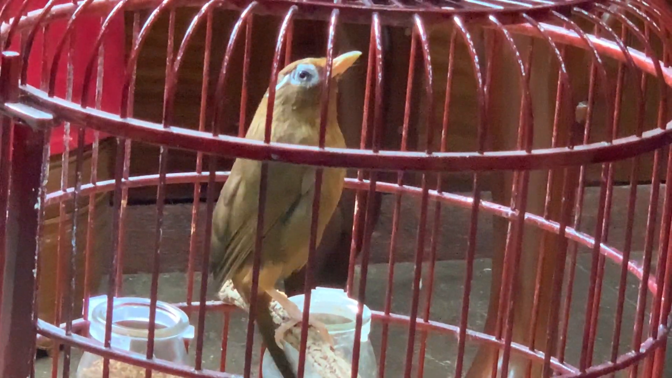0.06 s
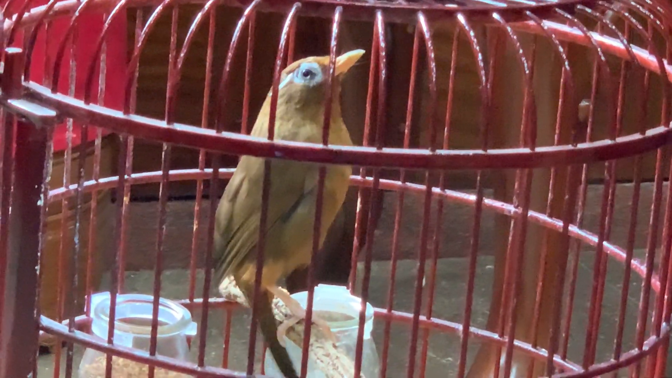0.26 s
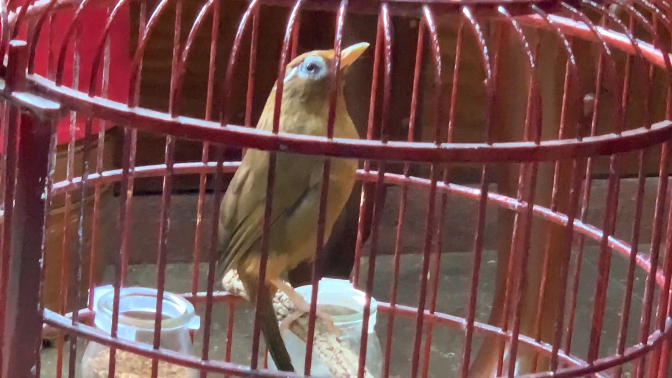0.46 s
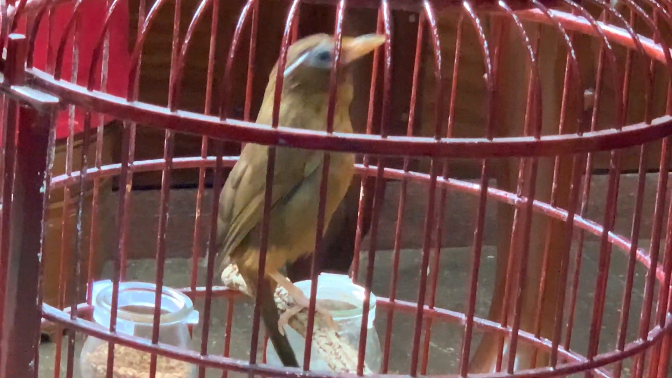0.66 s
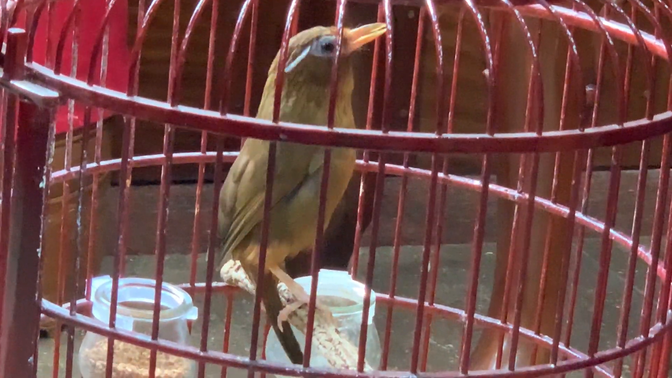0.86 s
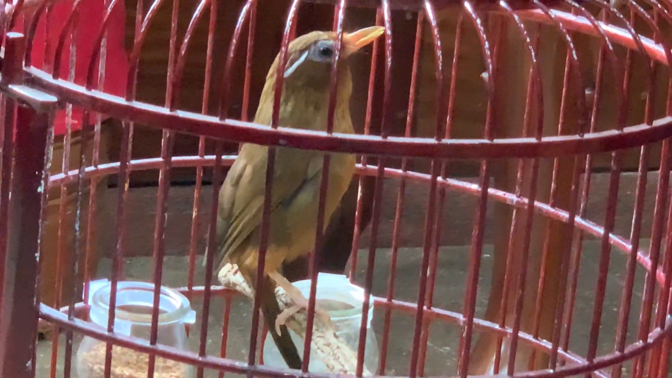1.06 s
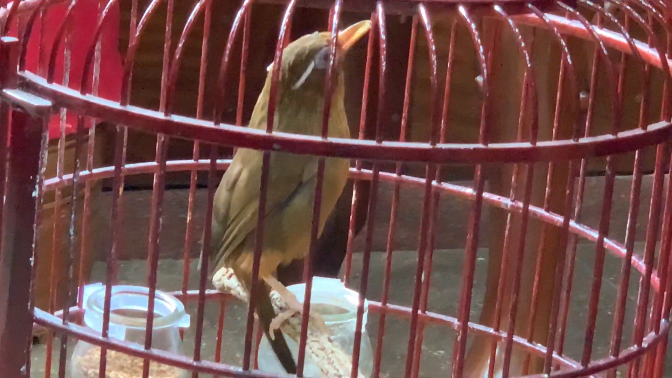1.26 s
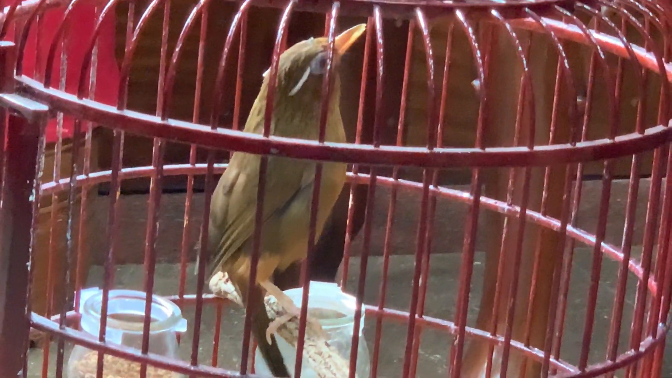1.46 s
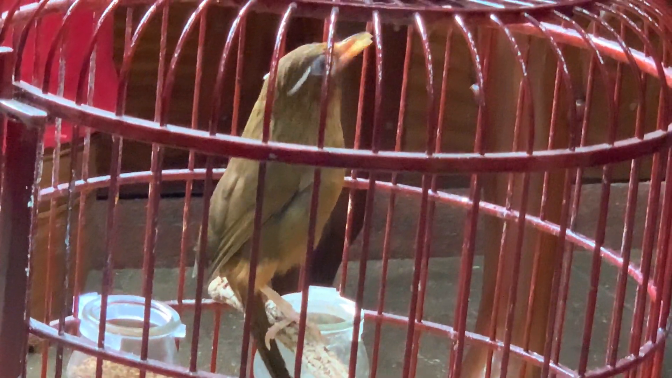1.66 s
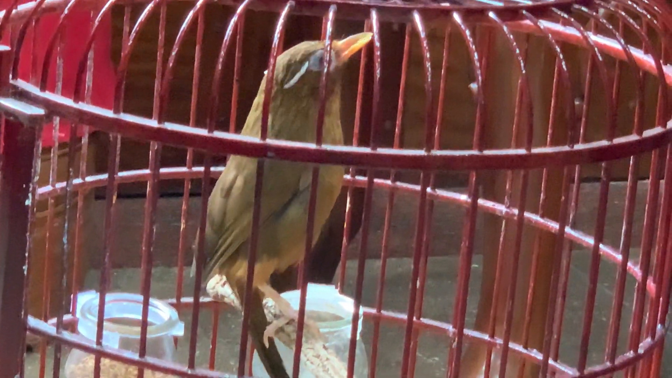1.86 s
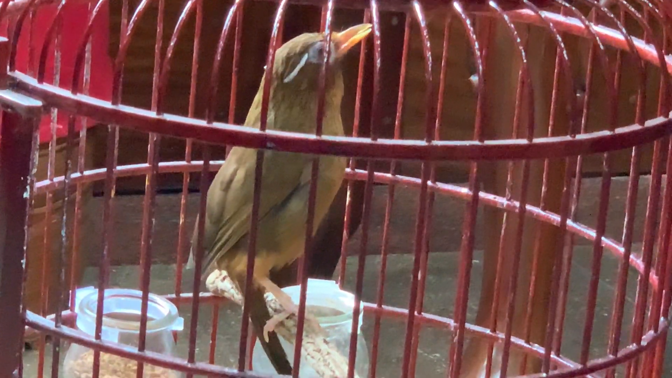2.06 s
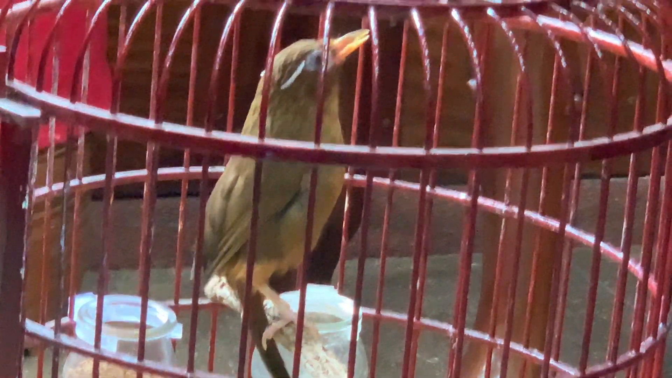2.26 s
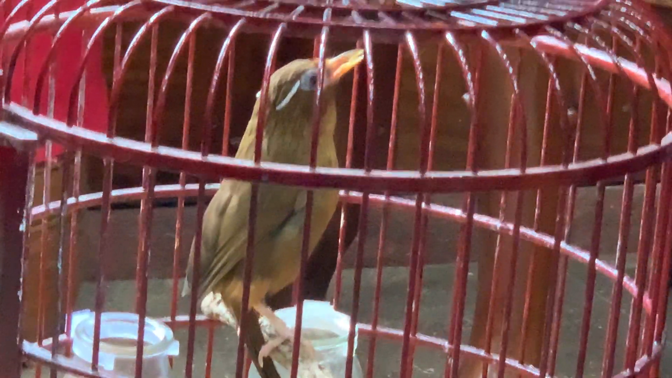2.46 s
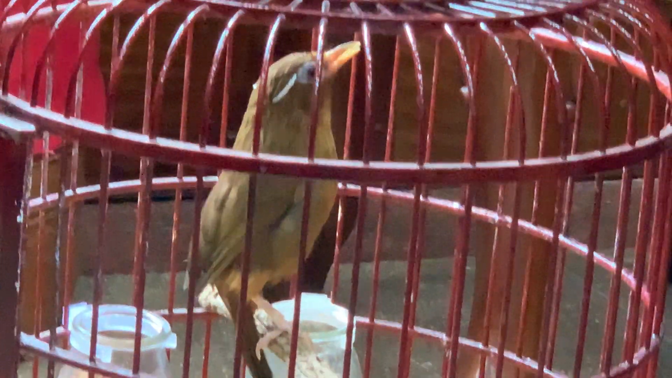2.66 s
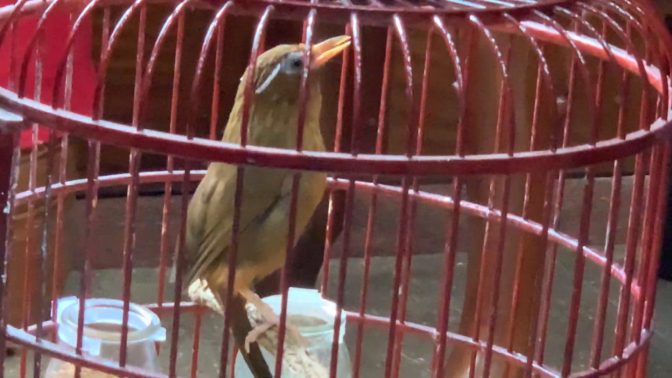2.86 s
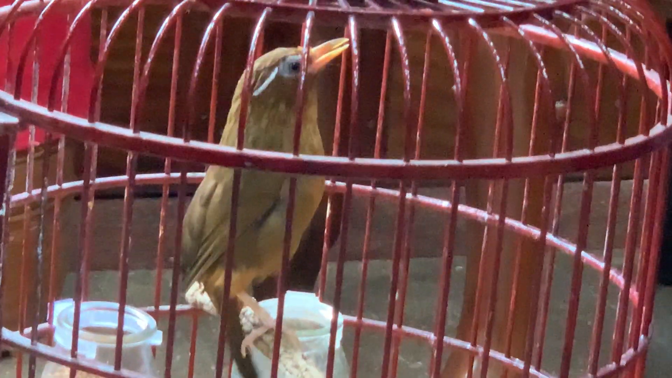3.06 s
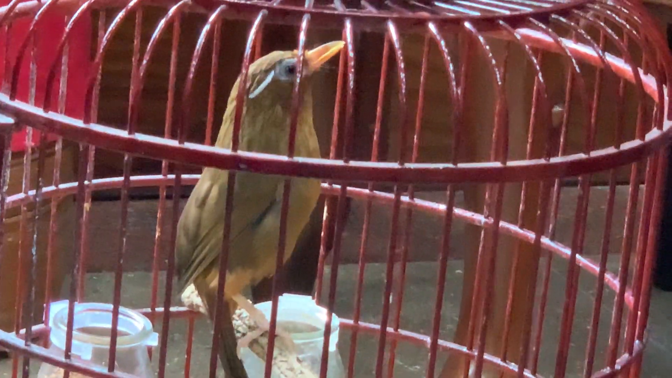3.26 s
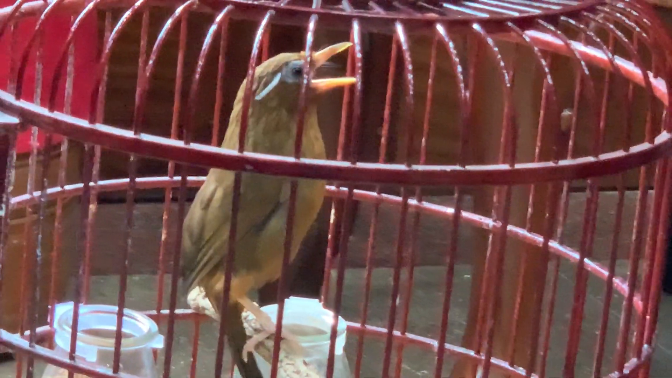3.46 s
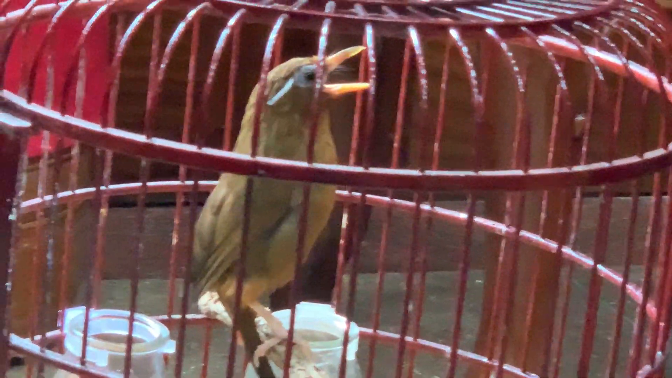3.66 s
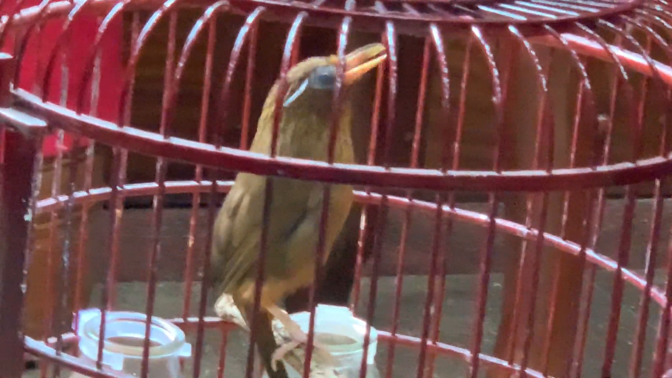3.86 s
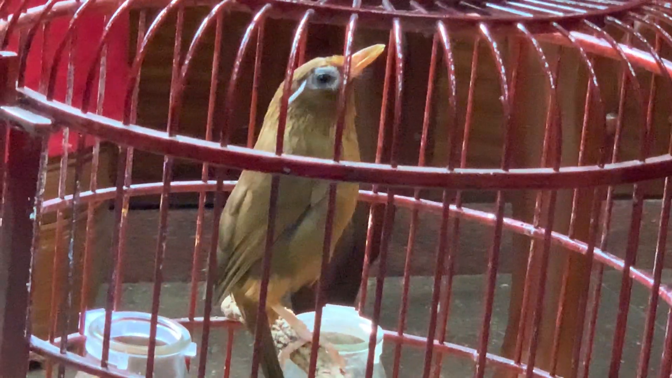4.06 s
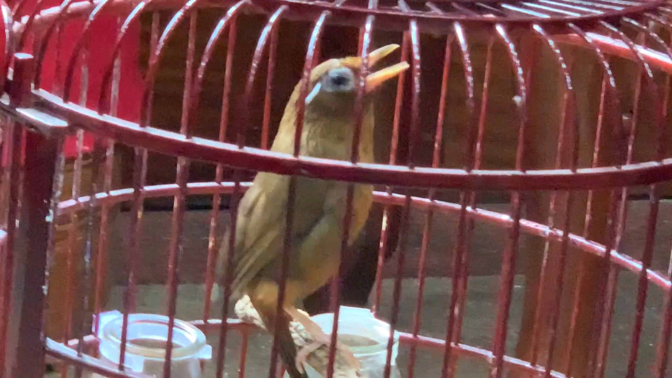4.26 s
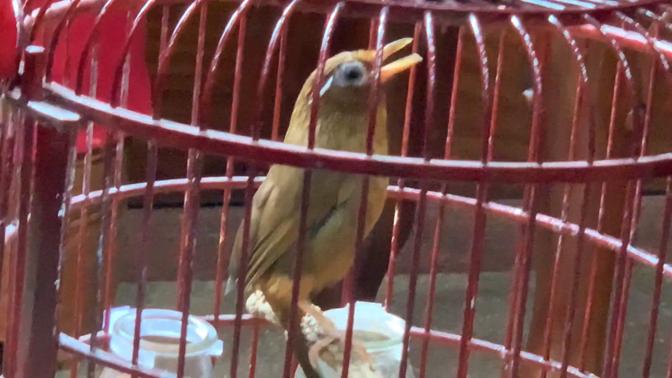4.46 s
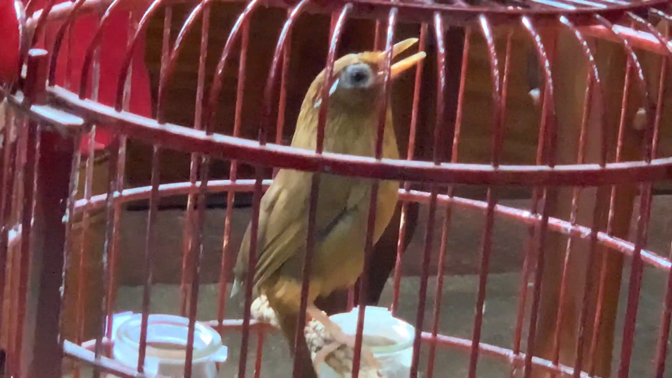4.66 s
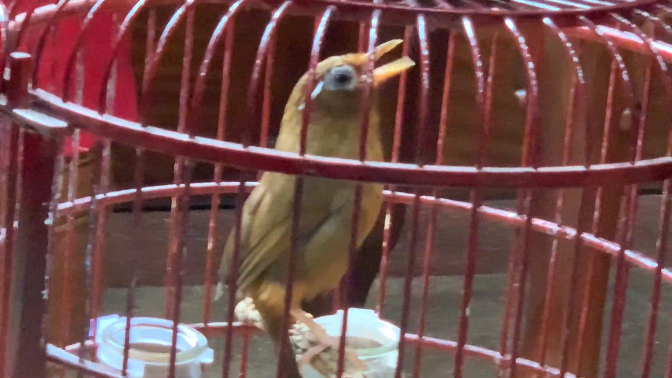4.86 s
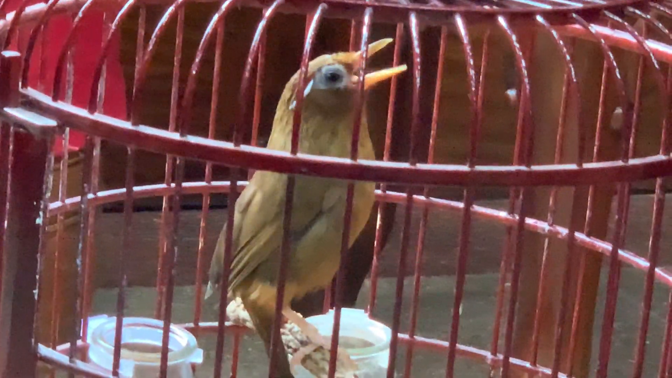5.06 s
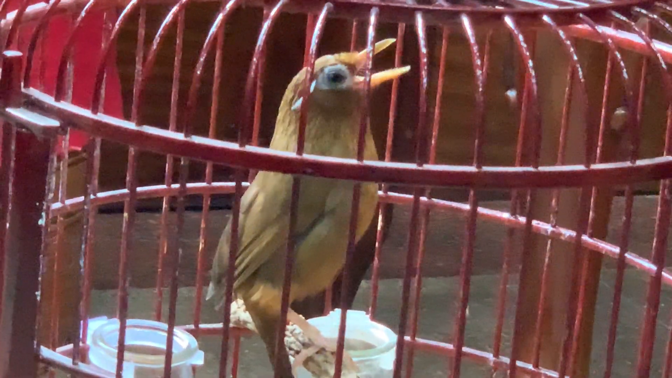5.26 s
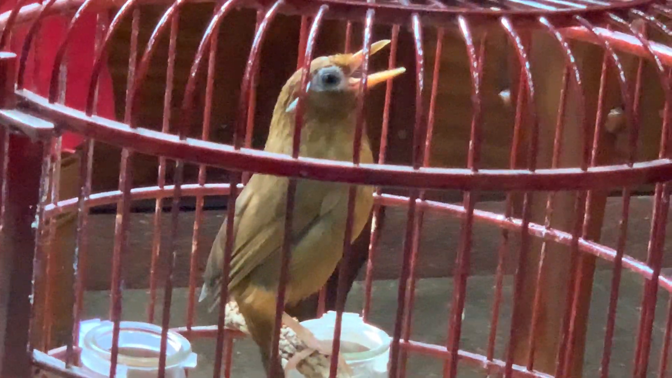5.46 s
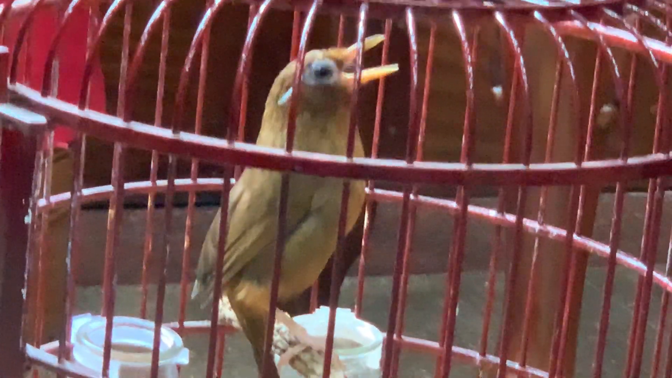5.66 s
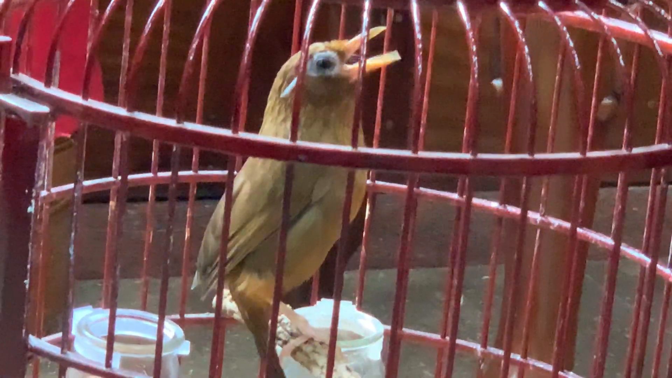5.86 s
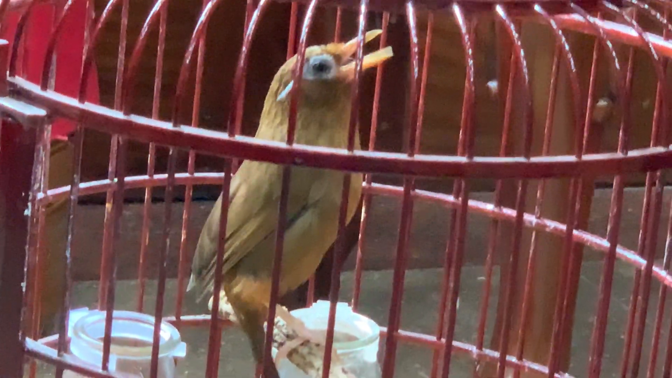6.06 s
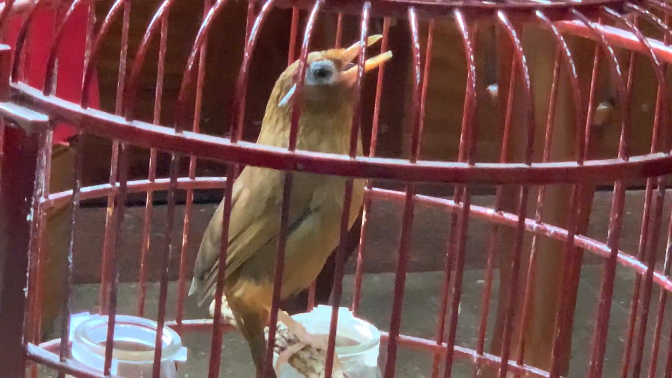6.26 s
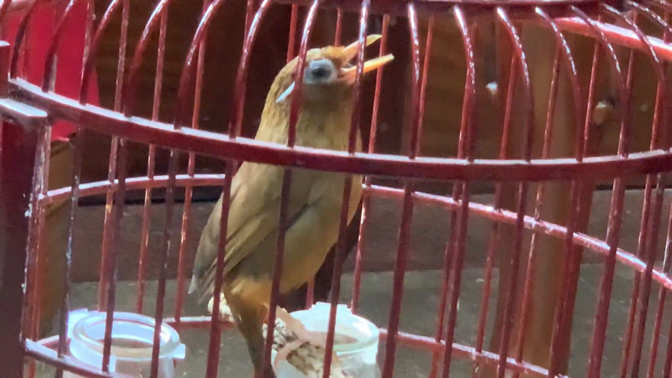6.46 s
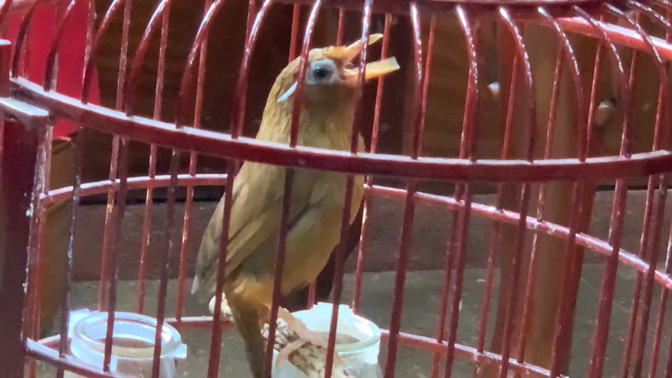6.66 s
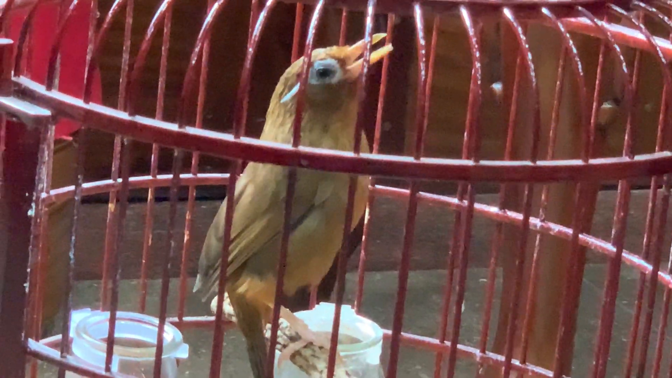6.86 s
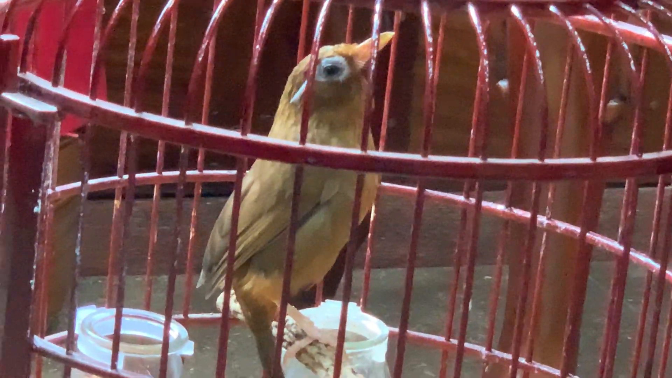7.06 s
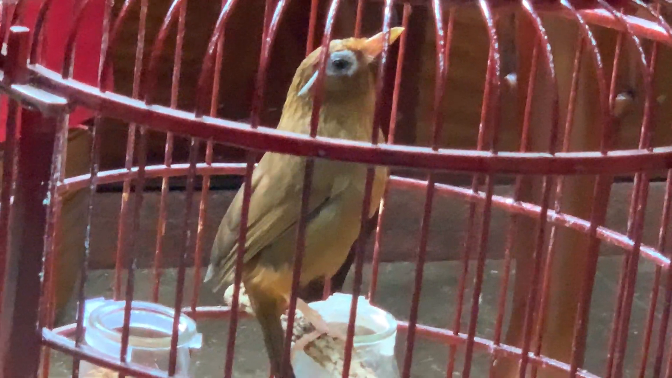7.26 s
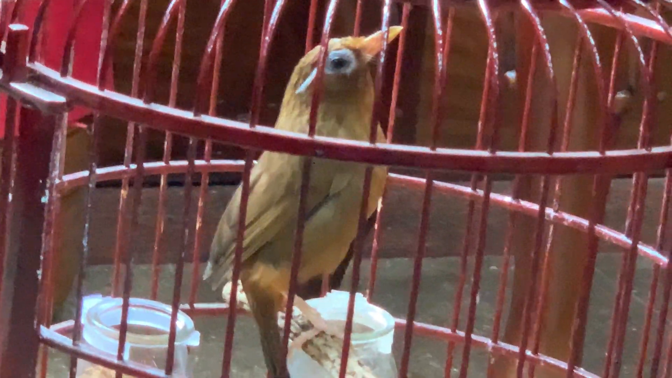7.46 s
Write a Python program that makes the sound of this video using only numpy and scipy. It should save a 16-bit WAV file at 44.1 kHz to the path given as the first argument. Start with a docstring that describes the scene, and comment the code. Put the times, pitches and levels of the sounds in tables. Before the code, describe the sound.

A caged songbird sings close by in a yard whose hard walls give each note a ringing tail. For the first two seconds it gives soft held whistles and quick chirps, with a few harsh rising rasps. From about 2 to 3.5 seconds the rasps come thicker and louder among the whistles. At 3.5 seconds a high, screechy warble begins, sinking into lower chatter from about 4.2 to 5 seconds. Then comes an even run of falling slurs, about four a second, joined from 5.3 seconds by loud, piercing arched notes that turn buzzier until about 7.2 seconds. A few lower chirps and a falling note close the song near 7.5 seconds. Puffs of air thump softly on the microphone now and then until about 5.5 seconds, strongest around 4.5. A faint, low hum of distant town lies underneath throughout.

```python
"""Soft whistles and harsh rising rasps ring out close by: a caged hwamei singing in an echoing yard.
A warble follows, then loud arched notes over a run of falling slurs. Each note is a gliding syrinx tone
with overtones, roughened by fast flutter of the membrane. Hard walls draw the notes out; puffs of air
thump on the microphone over a low, distant hum of town."""
import sys
import numpy as np
from scipy import signal
from scipy.fft import rfft, irfft, next_fast_len
from scipy.io import wavfile
from scipy.ndimage import uniform_filter1d, map_coordinates

SR = 44100
rng = np.random.default_rng(int(sys.argv[2]) if len(sys.argv) > 2 else 0)


def persist_wave(psi):
    """Save psi, clipped to +-1, as 16-bit WAV."""
    counts = np.round(np.clip(psi, -1, 1) * 32767).astype(np.int16)
    wavfile.write(sys.argv[1], SR, np.atleast_2d(counts).T)


N = 330750
TIME = np.arange(N) / SR
PROGRESS = np.linspace(0, 1, 65)  # the course of a note, start to end

# tone colour of the town: frequency_hz, gain_db
TOWN_SPECTRUM = [(25, -55), (55, 9), (110, -7.5), (220, -2), (340, -1.5), (500, -4), (800, -9),
                 (1400, -8.5), (3000, -12), (6000, -35), (15000, -35.5)]
# slow swell of the town: time_s, level_db
TOWN_SWELL = [(0, -48.5), (1.7, -47), (7.5, -43.5)]
# gusts of air on the microphone: start_s, length_s, level_db
AIR_GUSTS = [(0, 0.18, -41.5), (0.642, 0.12, -28), (0.81, 0.039, -31.5), (0.962, 0.13, -36.5),
             (1.13, 0.16, -43.5), (1.799, 0.099, -32), (1.953, 0.29, -36), (2.322, 0.022, -31),
             (2.416, 0.23, -44), (3.135, 0.045, -29), (3.228, 0.1, -35), (3.992, 0.25, -44.5),
             (4.416, 0.085, -24), (4.556, 0.056, -27.5), (4.658, 0.053, -22), (4.795, 0.18, -38),
             (5.192, 0.11, -39.5), (5.295, 0.19, -34.5)]
# reverb time of the yard: frequency_hz, t60_s
YARD_DECAY = [(1000, 0.37), (2600, 1.18), (4800, 0.74), (8000, 0.89), (14000, 0.29)]
# EQ of the sound beamed straight from the beak: frequency_hz, gain_db
DIRECT_EQ = [(5000, -5), (7000, -1), (9000, -1.5), (14000, -1)]
# EQ of the sound that spreads into the yard: frequency_hz, gain_db
SPREAD_EQ = [(5000, -0.5), (6500, 2), (9000, -3), (14000, -1)]
# rise and fall of the high treble through the song: time_s, gain_db
TREBLE_RIDE = [(0, -25), (1.1, 12), (1.8, 1.5), (2.3, 6.5), (2.7, 7.5), (3.25, 9), (3.6, 1.5), (4.6, -12.5),
               (5.4, 2.5), (6.1, 2), (6.6, 1), (7.5, 2.5)]
# tone colour of the breath hiss: frequency_hz, gain_db
HISS_SPECTRUM = [(3000, 3.5), (5300, 7.5), (8000, -18.5), (11000, 8.5), (15500, 9)]
# treble resonances of the open beak: frequency_hz, gain_db
BEAK_EQ = [(5300, -1.5), (6000, -0.5), (7100, 2.5), (8300, 14.5), (9500, 8), (10800, 9.5), (12000, -2),
           (13300, 9.5), (14300, -8.5), (15500, -23)]
# the throat's notch just above the singing range: frequency_hz, gain_db
THROAT_EQ = [(4850, -3.5), (5250, -8), (5500, -19), (5800, -3), (6500, 0), (7200, -5)]
# short straight glides: start_s, length_s, from_hz, to_hz, level_db, octave_db, flutter_depth_hz
CHIRP_NOTES = [(0.093, 0.043, 1067, 1270, -51, 2, 25), (0.219, 0.022, 1050, 1004, -41, -8, 11),
               (0.264, 0.037, 1137, 1400, -43, -18, 21), (0.434, 0.027, 1130, 1354, -40.5, -9, 33),
               (0.486, 0.019, 1060, 1102, -36.5, -19, 12), (0.666, 0.033, 1826, 2030, -50, -2, 10),
               (1.082, 0.04, 1760, 2040, -46, -13, 35), (1.376, 0.012, 1506, 1512, -30, -24, 6.5),
               (1.548, 0.042, 1860, 2450, -43, -28, 47), (1.674, 0.059, 1630, 1920, -35.5, -14, 27),
               (4.321, 0.076, 3765, 2554, -28.5, -29, 67), (5.088, 0.17, 3860, 3366, -40, -31, 110),
               (5.295, 0.051, 3880, 3740, -30.5, -30, 53), (5.589, 0.051, 3400, 3700, -27, -36, 44),
               (5.75, 0.0535, 3570, 3337, -27.5, -22.5, 31), (7.006, 0.033, 1865, 1310, -28.5, -43, 66),
               (7.03, 0.14, 1284, 1151, -31, -23, 27.5), (7.02, 0.25, 1683, 1628, -50, -29, 91),
               (7.191, 0.034, 1289, 1274, -30, -41.5, 88), (7.366, 0.025, 1538, 1098, -31, -7, 68),
               (7.417, 0.085, 3130, 2390, -27, -38, 64)]
# soft held notes: start_s, swell_s, fade_s, pitch_hz, scoop_share, level_db, octave_db
WHISTLE_NOTES = [(-.02, 0.021, 0.13, 1886, 0.08, -35.5, -15),
                 (0.359, 0.096, 0.12, 1753, 0.08, -31.5, -15.5),
                 (0.832, 0.057, 0.11, 1631, 0.14, -33.5, -12), (0.966, 0.11, 0.023, 1519, 0.12, -40, -2),
                 (1.273, 0.14, 0.019, 1491, 0.02, -37.5, -8), (1.739, 0.03, 0.084, 1530, 0.12, -34, -9),
                 (2.002, 0.13, 0.17, 1493, 0.36, -32, -10), (2.414, 0.15, 0.076, 1469, 0.3, -33.5, -11),
                 (2.823, 0.178, 0.057, 1470, 0.34, -32.5, -15)]
# faint high overtones of a whistle: pitch_multiple, level_against_octave_db
WHISTLE_SHINE = [(4, -31.5), (6, -42), (7, -30.5), (9, -36)]
# harsh sweeps: start_s, length_s, rise_s, from_hz, top_hz, level_db, flutter_depth_hz, overtones_db
RASP_NOTES = [(0.268, .13, 0.18, 2454, 2850, -39.5, 174, -4),
              (0.687, 0.039, .04, 1150, 1608, -35.5, 219, -6),
              (.715, 0.18, 0.14, 2280, 3123, -38, 152, -5.5),
              (1.105, 0.11, 0.051, 1450, 1968, -35, 381, -5),
              (1.569, 0.08, .045, 1500, 1905, -31.5, 328, -4),
              (1.753, 0.02, 0.029, 2000, 2140, -29.5, 170, -13),
              (1.971, 0.055, 0.076, 2230, 3250, -28.5, 266, -14.5),
              (2.019, 0.13, 0.043, 3187, 3640, -29, 297, -7.5),
              (1.995, 0.096, .034, 1900, 1880, -31, 180, 2.5),
              (2.133, .07, 0.029, 2600, 2708, -32, 127, 3.5),
              (2.308, 0.077, 0.059, 2584, 3077, -31.5, 233, -8),
              (2.358, 0.086, 0.037, 3150, 3645, -26, 277, -9),
              (2.399, 0.08, 0.064, 2002, 2344, -30, 163, -13),
              (2.48, 0.052, .03, 2250, 2512, -30.5, 170, 6.5),
              (2.571, 0.12, 0.071, 2550, 3000, -37, 149, -5),
              (2.673, 0.087, 0.06, 2513, 3106, -31.5, 230, -2.5),
              (2.714, 0.097, .033, 3255, 3860, -30.5, 268, -5),
              (2.805, 0.071, 0.052, 1902, 2384, -25, 152, 2.5),
              (2.839, .06, 0.036, 3100, 3420, -33.5, 280, 6.5),
              (2.974, 0.1, 0.047, 2800, 3200, -38, 219, -3), (3.043, 0.068, .05, 2543, 3326, -28, 295, -10),
              (3.07, 0.14, 0.031, 3400, 4170, -31.5, 229, -4.5),
              (3.166, 0.096, 0.021, 3050, 3154, -35, 202, 9.5),
              (3.41, 0.057, 0.076, 1950, 3200, -27.5, 286, -1),
              (3.454, 0.045, 0.037, 2900, 3694, -25, 378, -7.5)]
# partials of a rasp: pitch_multiple, level_db
RASP_PARTIALS = [(.5, -28), (1, 1), (1.5, -13.5), (2, -19.5), (2.5, -35), (3, -34), (3.5, -38), (4.5, -36)]
# wavering notes: start_s, length_s, foot_hz, top_hz, level_db, flutter_depth_hz
WARBLE_NOTES = [(3.473, 0.054, 3700, 4050, -22.5, 148), (3.533, 0.12, 3888, 4626, -24, 128),
                (3.578, 0.015, 4590, 4690, -21.5, 50), (3.58, 0.079, 3500, 4050, -24.5, 300),
                (3.682, 0.091, 4270, 4980, -22, 76.5), (3.699, 0.045, 3950, 4170, -21.5, 110),
                (3.758, 0.0506, 3690, 3800, -21, 128), (3.825, 0.073, 4053, 4386, -23.5, 81),
                (3.934, 0.24, 2962, 3930, -23, 135), (4.184, 0.068, 1970, 2097, -23.5, 137),
                (4.218, 0.03, 2242, 2395, -17.5, 70), (4.297, 0.041, 2050, 2435, -18.5, 159),
                (4.398, 0.042, 2275, 2420, -17, 75.4), (4.471, 0.098, 2050, 2330, -23, 164),
                (4.638, 0.057, 2190, 2388, -20.5, 91), (4.726, 0.073, 2394, 2469, -20, 33.7),
                (4.874, 0.036, 2172, 2314, -18.5, 99.5), (4.896, 0.14, 2680, 2758, -22.5, 237)]
# partials of the lower warbles: pitch_multiple, level_db
WARBLE_PARTIALS = [(1, 4), (2, -29), (3, -62)]
# falling notes, pitched by their second harmonic:
# start_s, time_to_mid_drop_s, from_hz, end_hz, level_db, accent_db
SLUR_NOTES = [(4.993, 0.069, 3100, 1953, -32.5, 8), (5.177, 0.078, 3098, 2028, -34, 14),
              (5.38, 0.076, 3156, 2070, -30, 9), (5.593, 0.07, 3094, 2060, -31.5, 11.5),
              (5.811, 0.076, 3090, 2078, -31, 11), (6.029, 0.08, 3170, 2090, -31.5, 11.5),
              (6.26, .081, 3138, 2090, -29, 8), (6.493, 0.076, 3230, 2140, -28, 8),
              (6.735, 0.069, 3703, 2407, -26.5, -1.5)]
# partials of a slur, the fundamental at 0.5: pitch_multiple, level_db
SLUR_PARTIALS = [(.5, -13.5), (1, 2.5), (2, -30), (2.5, -38)]
# loud arched notes, pitched by their second harmonic:
# start_s, length_s, top_hz, end_hz, roundness, level_db, crescendo_db, buzz_depth_hz
ARCH_NOTES = [(5.329, 0.15, 4636, 3686, 2.62, -23.5, 1, 50.6),
              (5.634, 0.14, 4637, 3750, 2.4, -22.5, -2.5, 60.5),
              (5.912, 0.15, 4830, 3610, 2.85, -21, -5.5, 40),
              (6.185, 0.15, 4940, 3830, 2.77, -21.5, 0, 202), (6.475, .145, 4952, 3560, 2, -24, -2, 322),
              (6.77, 0.14, 4920, 3754, 1.88, -23.5, 1, 357),
              (7.075, .148, 4880, 3306, 2.17, -23.5, 2.5, 328)]
# partials of an open-beaked note, the fundamental at 0.5: pitch_multiple, level_db
OPEN_BEAK_PARTIALS = [(.5, -20.5), (1, 7), (1.5, -24), (2, -20.5), (2.5, -22), (3, -16.5)]

BUZZ_RATE_HZ, BUZZ_WANDER = 340, 0.139  # a pressed membrane breaks into a fast, unsteady buzz


def undb(db):
    """Decibels to gain."""
    return 10 ** (np.asarray(db) / 20)


def unit(x):
    """Scale to rms 1."""
    return x / np.sqrt(np.mean(x ** 2))


def lowpass(x, hz, order=2):
    """Butterworth low-pass."""
    return signal.sosfilt(signal.butter(order, hz, fs=SR, output="sos"), x)


def wobble(hz, size):
    """Random motion up to hz, spread 1."""
    return unit(lowpass(rng.standard_normal(size + SR // 10), hz))[-size:]


def shaped(x, points):
    """Filter by a curve of (Hz, dB) points."""
    hz, db = np.transpose(points)
    size = next_fast_len(N + SR // 10)
    bins = np.maximum(np.arange(size // 2 + 1) * SR / size, 1)
    return irfft(rfft(x, size) * undb(np.interp(np.log(bins), np.log(hz), db)), size)[:N]


def coloured(points):
    """Noise with a spectrum of (Hz, dB) points, rms 1."""
    return unit(shaped(rng.standard_normal(N), points))


def delayed(x, lag_s):
    """The same sound a little later."""
    return map_coordinates(x, [np.arange(N) - lag_s * SR], order=3)


def town():
    """A bed of distant town noise, wavering slightly and nearly centred in the bass."""
    mid, side = coloured(TOWN_SPECTRUM), coloured(TOWN_SPECTRUM)
    side = side - 0.72 * lowpass(side, 1000, order=1)
    level_db = np.interp(TIME, *np.transpose(TOWN_SWELL)) + 0.96 * wobble(21, N)
    return undb(level_db - 3) * np.array([mid + side, mid - side])


def gust(start, length, db, attack_s=0.024, release_s=0.035):
    """Force of one gust: it builds, holds and dies away."""
    attack = np.clip((TIME - start) / attack_s, 0, 1)
    release = np.exp(-np.maximum(TIME - start - length, 0) / release_s)
    return undb(db) * attack * release


def puffs(eddy_hz=10.2, eddy_db=2.5):
    """Eddies thump on the microphone; stronger ones add a higher flapping."""
    force = sum(gust(*row) for row in AIR_GUSTS) * undb(eddy_db * wobble(eddy_hz, N))
    thump_eq = [(20, -57), (40, 0), (60, 5), (110, 1.5), (200, -10), (400, -63), (1000, -74), (4000, -92)]
    flap_eq = [(40, -65), (130, 6), (250, 2), (450, -10), (900, -32), (4000, -72)]
    flap_gain = undb(-2.5) * np.sqrt(force / force.max())
    mid = force * (coloured(thump_eq) + flap_gain * coloured(flap_eq))
    side = undb(-11.5) * force * coloured(thump_eq)
    return undb(-6) * np.array([mid + side, mid - side])


def yard_response(build_s=0.0009, early_db=1, early_s=0.018):
    """One channel of reverb: strong early echoes off near walls, then a tail longest in the mids."""
    t = TIME[:SR]
    noise = rfft(rng.standard_normal(SR))
    log_hz = np.log(np.maximum(np.arange(SR // 2 + 1), 1))
    band_hz, t60_s = np.transpose(YARD_DECAY)
    tail = np.zeros(SR)
    for weights, decay_s in zip(np.eye(len(band_hz)), t60_s):
        band = irfft(noise * np.interp(log_hz, np.log(band_hz), weights), SR)
        tail += band * np.exp(-np.log(1000) * t / decay_s)
    tail *= (1 - np.exp(-t / build_s)) * (1 + undb(early_db) * np.exp(-t / early_s))
    return tail / np.sqrt(np.sum(tail ** 2))


def in_yard(song, reverb, direct_db, bounce_db, wet_db):
    """Stage the bird: direct sound, a bounce from below the cage, a slap off a wall and the reverb."""
    treble = shaped(song, [(7000, -63), (9000, -8), (11500, -3)])
    treble_gain = undb(np.interp(TIME, *np.transpose(TREBLE_RIDE)))
    song = song + (treble_gain - 1) * treble
    beam, spread = shaped(song, DIRECT_EQ), shaped(song, SPREAD_EQ)
    direct = np.array([delayed(beam, lag_s=0.000295), beam])  # reaches the right side first
    bounce = delayed(spread, lag_s=0.0037)
    slap = undb(-21.5) * delayed(spread, lag_s=0.04)
    tail = signal.fftconvolve(spread[None], reverb, axes=1)[:, :N]
    return undb(direct_db) * direct + undb(bounce_db) * bounce + undb(wet_db) * (tail + slap)


def through_beak(song, hiss_db):
    """Breath turbulence rises and falls with the tone; the beak colours both."""
    envelope = np.sqrt(np.abs(uniform_filter1d(song ** 2, size=256)))
    hiss = undb(hiss_db) * envelope * coloured(HISS_SPECTRUM)
    return shaped(song + hiss, BEAK_EQ)


def syrinx(rows, tones, flutter_hz, rate_hz, shimmer_db, edge_s, buzz_hz=0):
    """One note: a tone glides along its contour while the membrane flutters in pitch and strength."""
    s, hz, db = np.transpose(rows)[:3]
    sounding = (TIME > s[0] - edge_s) & (TIME < s[-1] + edge_s)
    t = TIME[sounding]

    def along(values):
        return np.interp(t, s, values * np.ones(len(s)))

    flutter = along(flutter_hz) * np.sqrt(2) * np.tanh(wobble(rate_hz, len(t)))
    buzz_rate_hz = BUZZ_RATE_HZ * (1 + BUZZ_WANDER * wobble(rate_hz, len(t)))
    buzz = along(buzz_hz) * np.sin(2 * np.pi * np.cumsum(buzz_rate_hz) / SR)
    phase = 2 * np.pi * np.cumsum(along(hz) + flutter + buzz) / SR
    valve = np.sin(np.pi / 2 * np.clip(np.minimum(t - t[0], t[-1] - t) / edge_s, 0, 1)) ** 2
    strength = undb(along(db)) * unit(undb(shimmer_db * wobble(rate_hz / 2, len(t))))
    tension = (along(hz) / np.mean(hz)) ** 0.94  # a tighter membrane gives stronger overtones
    out = np.zeros(N)
    for multiple, tone_db in tones:
        gain = undb(along(tone_db)) * (tension if multiple > 1 else 1)
        out[sounding] += np.sqrt(2) * valve * strength * gain * np.sin(multiple * phase)
    return out


def chirps():
    """Quick straight glides among the longer notes."""
    song = np.zeros(N)
    for start, length, from_hz, to_hz, db, octave_db, flutter_hz in CHIRP_NOTES:
        contour = [(start, from_hz, db), (start + length, to_hz, db)]
        partials = [(1, 0.75), (2, octave_db)]
        song += syrinx(contour, partials, flutter_hz, rate_hz=170, shimmer_db=2.5, edge_s=0.0088)
    return through_beak(song, hiss_db=-32.5)


def whistles(scoop_s=0.045):
    """Soft notes that scoop up to a held pitch; pressed ones have a strong octave and a faint shine."""
    song = np.zeros(N)
    for start, swell_s, fade_s, hz, scoop, db, octave_db in WHISTLE_NOTES:
        t = PROGRESS * (swell_s + fade_s)
        swell_db = np.interp(t, [0, swell_s, t[-1]], [-14, 0, -6])
        flat = scoop * np.exp(-t / scoop_s)  # the flatter the pitch, the weaker the tone
        contour = np.column_stack([start + t, hz * (1 - flat), db + swell_db - flat])
        partials = [(1, 0.31), (2, octave_db)] + [(k, octave_db + shine) for k, shine in WHISTLE_SHINE]
        song += syrinx(contour, partials, flutter_hz=12.9, rate_hz=59, shimmer_db=2, edge_s=0.0063)
    return through_beak(song, hiss_db=-41)


def rasps(attack_s=0.016, fade_db_per_s=31.5, sag_per_s=1.1, opening_db_per_s=4.5):
    """Calls torn wide by fast flutter: they climb, then sag as the push runs out."""
    song = np.zeros(N)
    for start, length, rise_s, from_hz, top_hz, db, flutter_hz, overtones_db in RASP_NOTES:
        t = PROGRESS * length
        climb_hz = from_hz + (top_hz - from_hz) * np.sin(np.pi / 2 * np.minimum(t / rise_s, 1))
        sag = 1 - sag_per_s * np.maximum(t - rise_s, 0)
        push_db = np.interp(t, [0, attack_s], [-5, 0]) - fade_db_per_s * np.maximum(t - attack_s, 0)
        contour = np.column_stack([start + t, climb_hz * sag, db + push_db])
        partials = [(k, level + (k > 1) * overtones_db) for k, level in RASP_PARTIALS]
        song += syrinx(contour, partials, flutter_hz, rate_hz=225, shimmer_db=6, edge_s=0.009)
    opening_db = opening_db_per_s * (np.clip(TIME, 1, 3.3) - 4.7)  # more hiss as the beak opens wider
    return through_beak(song, hiss_db=-20 + opening_db)


def arch_contour(start, length, foot_hz, top_hz, end_hz, roundness, db, edge_db):
    """A note whose pitch and level rise and fall together: time_s, pitch_hz, level_db."""
    slack = np.abs(2 * PROGRESS - 1) ** roundness
    base_hz = np.where(PROGRESS < 0.5, foot_hz, end_hz)
    pitch_hz = top_hz + (base_hz - top_hz) * slack
    return np.column_stack([start + length * PROGRESS, pitch_hz, db + edge_db * slack])


def warbles(open_beak_hz=4250):
    """A screech that sinks into low chatter; the highest notes have the overtones of the open beak."""
    song = np.zeros(N)
    for start, length, foot_hz, top_hz, db, flutter_hz in WARBLE_NOTES:
        contour = arch_contour(start, length, foot_hz, top_hz, foot_hz, roundness=2.7, db=db, edge_db=-2)
        partials = OPEN_BEAK_PARTIALS if top_hz > open_beak_hz else WARBLE_PARTIALS
        song += syrinx(contour, partials, flutter_hz, rate_hz=153, shimmer_db=3.5, edge_s=0.008)
    return shaped(through_beak(song, hiss_db=-20.5), THROAT_EQ)


def slurs(knee_hz=3030, bend_s=0.00718, hook_s=0.032, accent_lag_s=0.005, accent_width_s=0.0079):
    """Clean notes that sink to a knee, then drop in an S-curve, most with an accent on the way down."""
    song = np.zeros(N)
    for start, drop_s, from_hz, end_hz, db, accent_db in SLUR_NOTES:
        t = PROGRESS * (drop_s + hook_s)
        held_hz = np.interp(t, [0, drop_s - 2 * bend_s], [from_hz, knee_hz])
        dropped = (1 + np.tanh((t - drop_s) / (2 * bend_s))) / 2
        pitch_hz = held_hz + (end_hz - held_hz) * dropped
        body_db = np.interp(t, [0, drop_s / 2, drop_s, t[-1]], [-0.5, 0, 0, -1.5])
        accent = np.exp(-((t - drop_s - accent_lag_s) / accent_width_s) ** 2)
        contour = np.column_stack([start + t, pitch_hz, db + body_db + accent_db * accent])
        song += syrinx(contour, SLUR_PARTIALS, flutter_hz=9, rate_hz=176, shimmer_db=2, edge_s=0.0095)
    throat = signal.butter(8, 1330, "high", fs=SR, output="sos")  # loses the fundamental as it sinks
    return through_beak(signal.sosfilt(throat, song), hiss_db=-26)


def arches(foot_hz=3704, press_db=3, buzz_dull_db=-5):
    """Piercing notes that turn brighter and ragged as they fall; the later ones buzz hard at the crest."""
    ramp = PROGRESS - 0.5
    falling = np.clip(10 * (PROGRESS - 0.64), 0, 1)
    crest = np.exp(-((PROGRESS - 0.59) / 0.15) ** 4)
    song = np.zeros(N)
    for start, length, top_hz, end_hz, roundness, db, crescendo_db, buzz_hz in ARCH_NOTES:
        level_db = db + crescendo_db * ramp
        contour = arch_contour(start, length, foot_hz, top_hz, end_hz, roundness, level_db, edge_db=-3.5)
        # the overtones grow whatever the crescendo, and the buzz robs them
        overtones_db = (press_db - crescendo_db) * ramp + buzz_dull_db * crest * buzz_hz / BUZZ_RATE_HZ
        partials = [(k, level + (k > 1) * overtones_db) for k, level in OPEN_BEAK_PARTIALS]
        song += syrinx(contour, partials, flutter_hz=10 + 60 * falling, rate_hz=160, shimmer_db=4,
                       edge_s=0.0086, buzz_hz=buzz_hz * crest)
    return shaped(through_beak(song, hiss_db=-45), THROAT_EQ)


def scene():
    """The mix: all the notes in one yard, with air on the microphone and the town behind."""
    reverb = np.array([yard_response(), yard_response()])
    song = (in_yard(whistles(), reverb, direct_db=-2, bounce_db=-5.5, wet_db=-1.5)
            + in_yard(chirps(), reverb, direct_db=-5, bounce_db=-6, wet_db=0)
            + in_yard(rasps(), reverb, direct_db=-4, bounce_db=-13, wet_db=-0.5)
            + in_yard(warbles(), reverb, direct_db=-5.5, bounce_db=-12.5, wet_db=-2.5)
            + in_yard(arches(), reverb, direct_db=-6.5, bounce_db=-12, wet_db=-3)
            + in_yard(slurs(), reverb, direct_db=-5.5, bounce_db=-4, wet_db=0.5))
    return song + puffs() + town()


def record(dry):
    """The recorder thins the deepest bass and cuts the top."""
    low_cut = signal.butter(2, 32, "high", fs=SR, output="sos")
    high_cut = signal.ellip(8, 0.2, 70, 15700, fs=SR, output="sos")
    return signal.sosfilt(high_cut, signal.sosfilt(low_cut, dry))


dry = scene()
out = record(dry)
persist_wave(out)
```